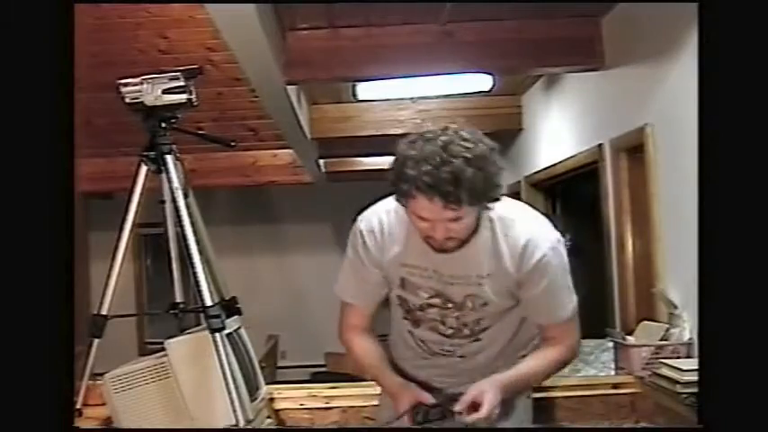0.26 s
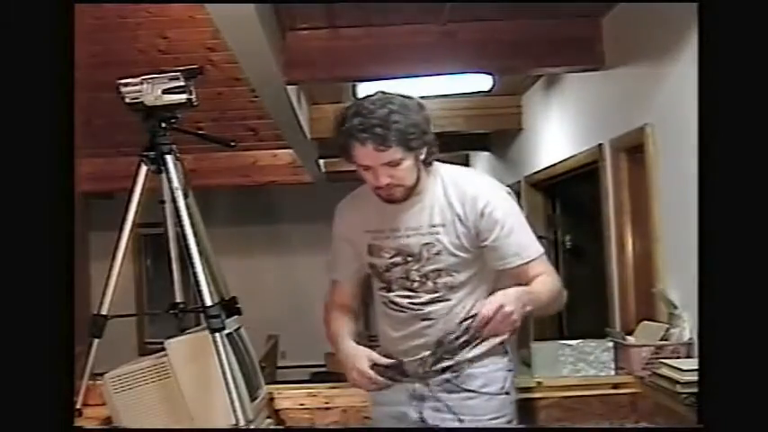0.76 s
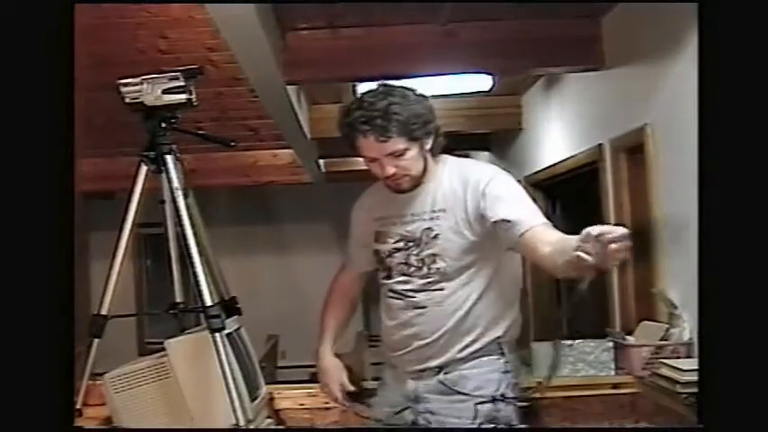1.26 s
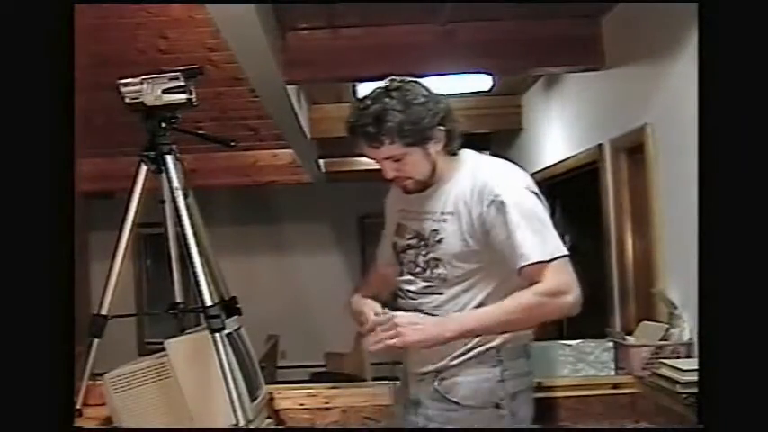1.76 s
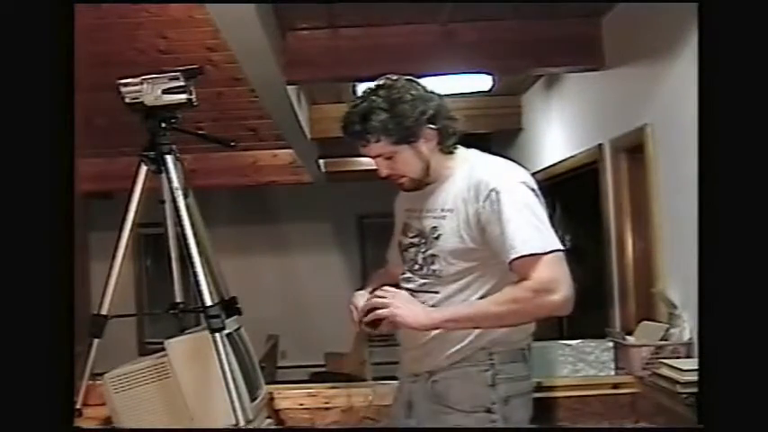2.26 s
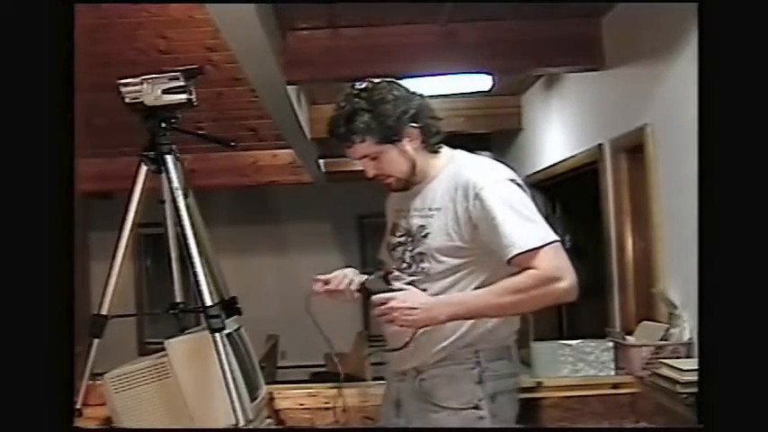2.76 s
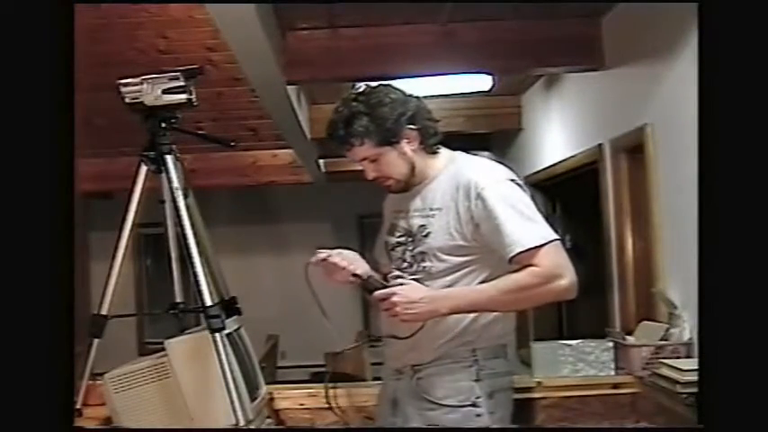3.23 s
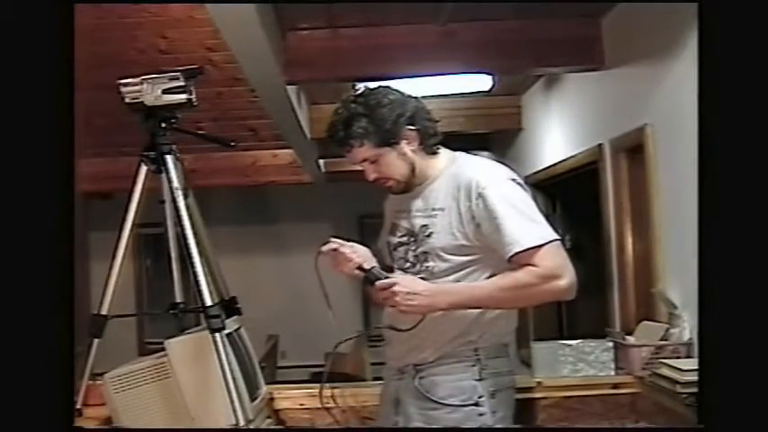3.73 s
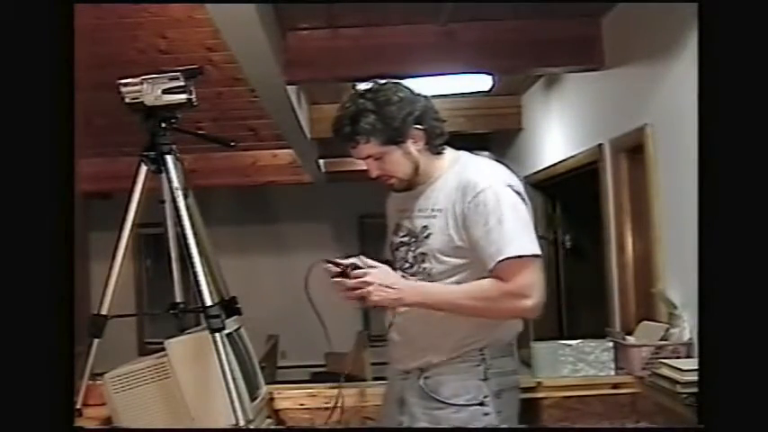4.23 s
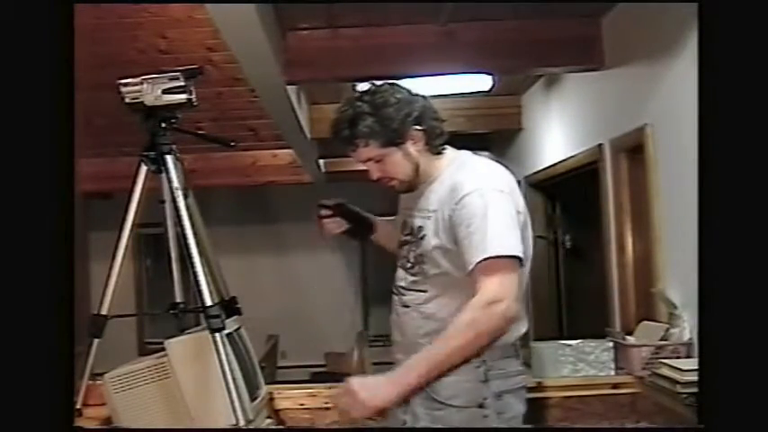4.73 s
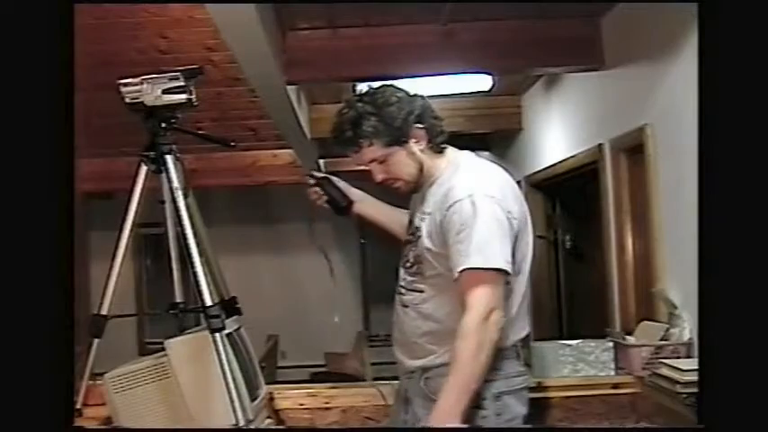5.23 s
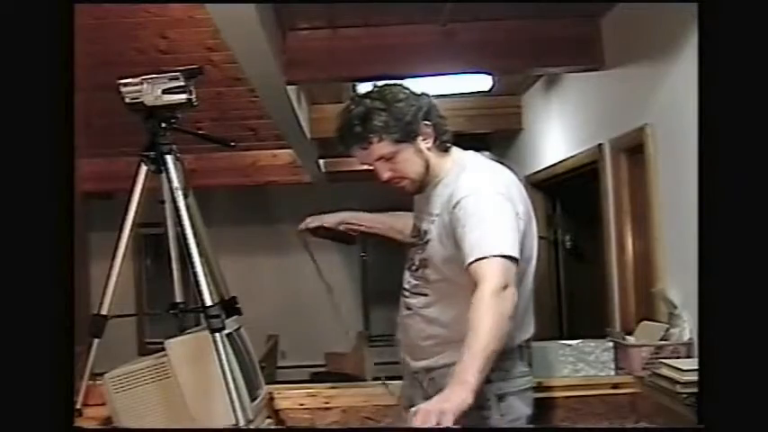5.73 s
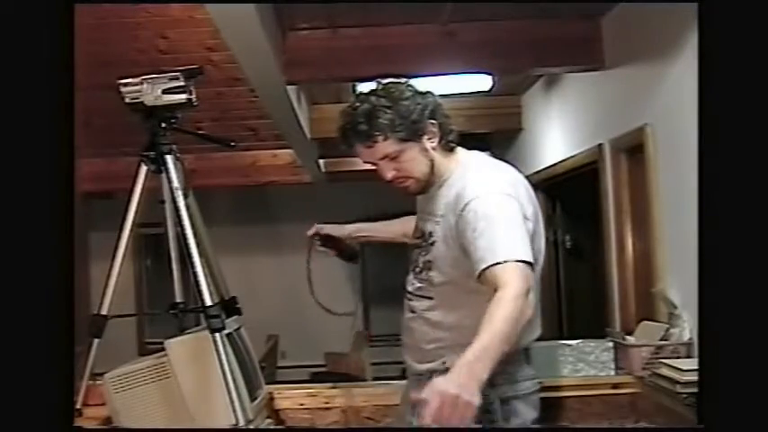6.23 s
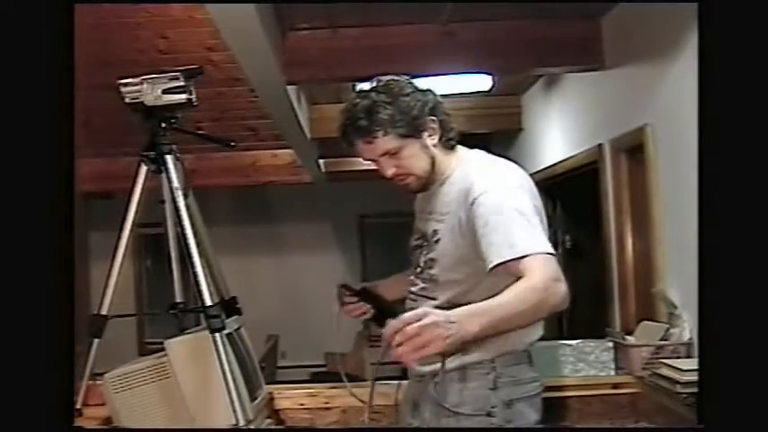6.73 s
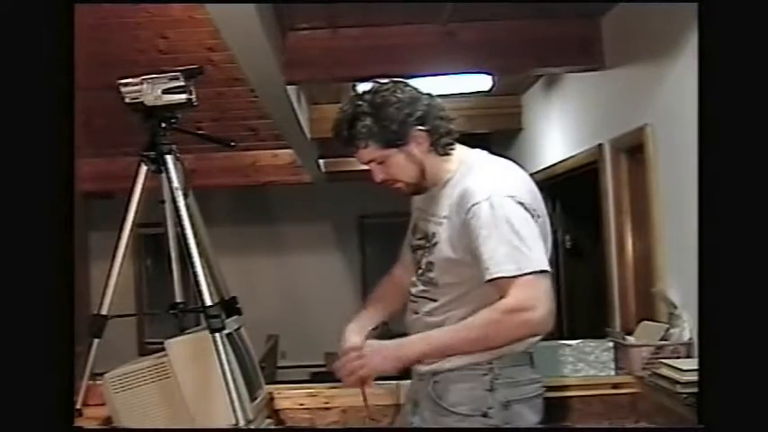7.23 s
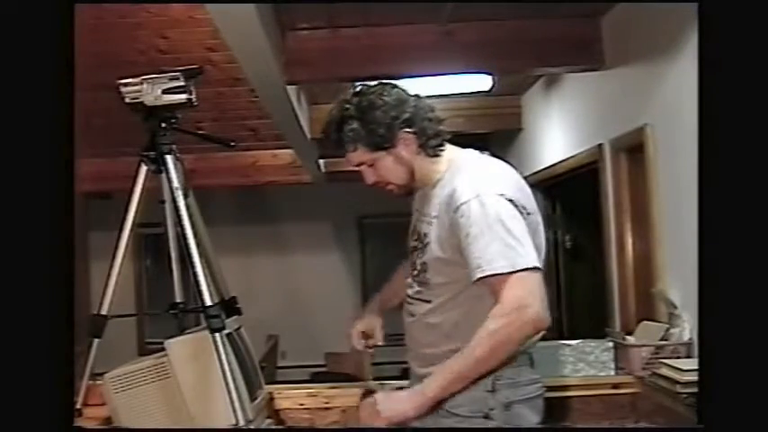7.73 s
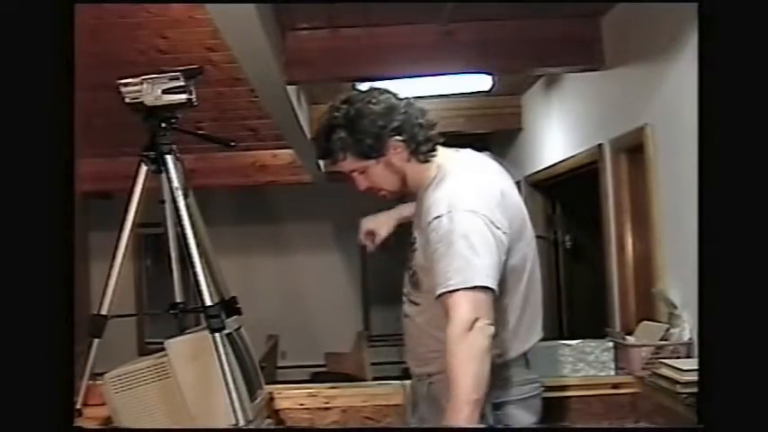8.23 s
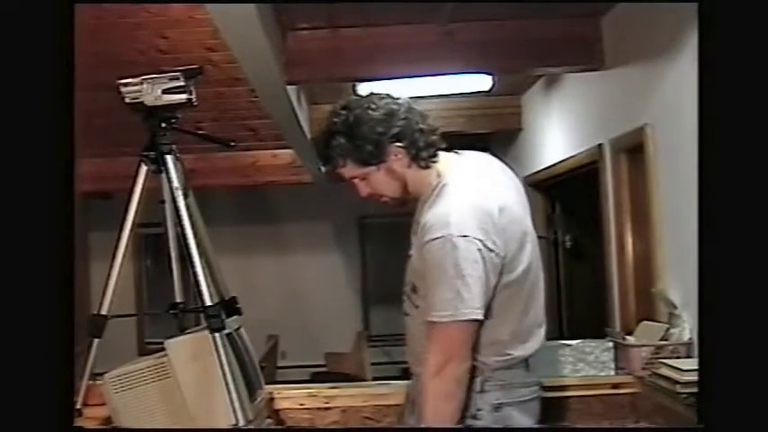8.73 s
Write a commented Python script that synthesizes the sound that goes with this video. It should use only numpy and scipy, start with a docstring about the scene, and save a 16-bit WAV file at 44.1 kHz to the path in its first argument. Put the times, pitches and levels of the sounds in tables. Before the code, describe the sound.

A power cord with a plastic plug block is picked up, turned over and put down on a wooden workbench. The cord slides and faintly squeaks through the hands, then sharp plastic snaps and hollow wooden knocks come at irregular intervals, with light ticks between. After a quieter stretch, more knocks follow and a loud clack ends it. A close camcorder microphone catches the small workshop's low rumble, hiss and faint motor whirr.

```python
"""A plastic plug block knocks on a wooden workbench as its power cord is gathered, turned and put down. Each
impact excites the modes of the boards and the case, and a small workshop reverberates briefly. Hard parts snap
together and set the metal prongs ringing; the bench thuds softly; the cord ticks, slides and squeaks. Beneath
lie room rumble, hiss and the motor whirr of a camcorder, whose limiter holds the blows down."""
import sys
import numpy as np
from scipy import signal
from scipy.fft import rfft, irfft
from scipy.io import wavfile
from scipy.ndimage import uniform_filter1d, minimum_filter1d

SR = 44100
rng = np.random.default_rng(int(sys.argv[2]) if len(sys.argv) > 2 else 0)


def pcm_store(signal):
    """Save signal as 16-bit PCM."""
    levels = np.round(np.clip(np.atleast_2d(signal), -1, 1) * 32767)
    wavfile.write(sys.argv[1], SR, levels.astype(np.int16).T)


N = 396018
TIME = np.arange(N) / SR
RING = np.arange(int(.8 * SR)) / SR  # seconds since a contact

# spectrum of room rumble, motor whirr and hiss: frequency_hz, relative_db
NOISE_SPECTRUM = [(18, -74.5), (30, -57.5), (74, -2.5), (358, -8.5), (444, -11), (550, -9.5), (590, -3.5),
                  (698, -7.5), (885, -9.5), (1270, -14.5), (1460, -12.5), (3130, -19), (4480, -15.5),
                  (5680, -21.5), (8940, -24), (11600, -43), (19700, -120)]
# tones of the motor: pitch_hz, relative_db
MOTOR_TONES = [(597.5, -78.5), (721.4, -80), (1437, -79), (1556, -93), (1680, -85.5), (1798, -90),
               (4317, -86.5), (7849, -91.5)]
# shifts of the background level: start_s, new_gain_db
LEVEL_SHIFTS = [(1.671, 6.5), (2.784, -1.9), (3.76, 0.57), (6.029, 5), (7.156, 0.1)]
# strokes of the cord through the hands: start_s, length_s, relative_db
CORD_STROKES = [(0.324, 0.59, -51), (0.909, .32, -54.5), (1.327, .04, -46.5), (2.045, .07, -44),
                (2.13, .18, -70), (2.411, 0.057, -50), (2.737, .05, -53), (4.282, 0.023, -62.5),
                (4.59, 0.24, -62), (4.78, 0.13, -59.5), (4.927, 0.028, -65), (5.09, 0.047, -59),
                (7.448, 0.26, -64)]
# spectrum of sliding friction: frequency_hz, relative_db
FRICTION_SPECTRUM = [(200, -17), (900, -8), (2000, -7.5), (2800, -10.5), (3700, 0), (4800, 0),
                     (5800, -13.5), (9000, -30.5)]
# squeaks of the jacket under the fingers: start_s, length_s, start_hz, end_hz, level_db
JACKET_SQUEAKS = [(.52, 0.2, 4980, 4750, -60), (0.953, 0.088, 4380, 4120, -54),
                  (1.16, 0.047, 4930, 4740, -61.5), (2.128, .22, 3860, 3760, -65)]
# soft thuds of the bench: start_s, pitch_hz, relative_db
BENCH_THUDS = [(0.224, 109, -45), (0.34, 99, -51.5), (.715, 260, -55), (.794, 276, -61), (1.102, 105, -53),
               (1.74, 415, -37.5), (1.875, 363, -50), (1.912, 111, -56), (2.051, 111.8, -61),
               (2.534, 104.9, -56.5), (2.914, 137, -52), (3.059, 266, -55.5), (4.16, 315, -56.5),
               (5.41, 356, -68), (6.496, 110, -41.5), (6.515, 516, -38), (6.68, 462.6, -47.5),
               (6.69, 107, -57), (7.55, 237.5, -47), (7.823, 258, -52)]
# the cord flops onto the same board after each knock: delay_s, re_knock_db
CORD_FLOPS = [(.061, -19), (.15, -30.5)]
# ticks of cord and plug in the hands: start_s, low_hz, low_db, high_hz, high_db
SHELL_TICKS = [(.275, 2046, -53.5, 3760, -45.5), (.481, 1884, -57, 3540, -55.5),
               (1.347, 1800, -84, 4530, -51.5), (1.873, 1110, -53, 4230, -55.5),
               (1.936, 3090, -55.5, 4210, -56.5), (1.954, 1820, -58, 4020, -54.5),
               (2.052, 1906, -55.5, 3760, -50.5), (2.419, 2900, -65.5, 6210, -60.5),
               (2.526, 1035, -58.5, 4630, -71), (2.991, 1800, -56.5, 4660, -56),
               (3.009, 1840, -65, 5090, -58), (3.227, 2120, -56.5, 5620, -62.5),
               (3.442, 1310, -55.5, 2630, -60), (3.446, 1900, -57.5, 5570, -69.5),
               (3.6, 2325, -73, 4670, -62), (4.303, 2410, -76, 4070, -67), (4.64, 3560, -81, 4820, -61),
               (4.663, 4300, -73, 5600, -63), (4.796, 2530, -55, 4850, -58),
               (4.838, 1114, -66.5, 4850, -65), (4.94, 5700, -70.5, 4220, -55),
               (7.576, 2360, -67, 4550, -74), (8.14, 934, -56, 4420, -74), (8.888, 1125, -67, 4340, -65.5)]
# modes of the metal prongs: pitch_hz, relative_db, t60_s
PRONG_MODES = [(1248, 0, 0.16), (1285, 1.5, .11), (1757, 2, 0.12), (1900, -2, 0.16), (2110, -0.5, 0.19),
               (2270, -7, 0.14), (3430, -11.5, 0.7), (3760, -13, 0.93), (4300, -6, 0.33)]
# plastic snaps: start_s, clack_hz, click_hz, t60_s, level_db, thud_db, body_db, edge_db, prong_db
# (the last four are relative to level_db)
PLASTIC_SNAPS = [(.187, 1946, 3890, 0.17, -32, -50, -21.5, -35, -2.5),
                 (1.623, 1533, 4470, 0.21, -32, -7.5, -13, -28, -24),
                 (1.671, 1880, 4280, .25, -24.5, -11.5, -20.5, -11, -15.5),
                 (1.812, 2000, 3970, 0.073, -44.5, -18.5, -5.5, -35, -10.5),
                 (3.759, 2310, 4385, 0.18, -41, -40.5, -13, -16.5, -22),
                 (6.029, 1691, 4570, 0.25, -28.5, -11, -1.5, -19, -33),
                 (6.499, 1990, 4150, 0.11, -41.5, -6, -1, -37, -19),
                 (7.888, 1740, 3990, 0.15, -49.5, 4.5, 2, -27, -27),
                 (8.967, 1350, 4356, 0.16, -21.5, 2.5, 3, -14.5, -12.5)]
# modes of the bench: pitch_hz, relative_db, base_t60_s (before added damping)
BENCH_MODES = [(236.3, -2.5, 0.14), (273.3, -16.5, 0.73), (310, -1, 0.22), (389, -4, 0.091),
               (457, -12.5, 0.33), (542, -7, 0.28), (599, -13.5, 0.47), (721, -3.5, 0.18), (783, -20, 0.52),
               (931, -38, 0.37), (1007, -20.5, 0.17), (1098, -35, 0.24), (1168, -15.5, 0.18),
               (1437, -48, 0.34)]
# knocks of the block on the bench: start_s, board_hz, level_db, frame_db, wood_db, hardness_hz
# (frame_db and wood_db weight the low thud and the woody midrange within one knock)
BLOCK_KNOCKS = [(1.737, 237.2, -21.5, -19.5, -16, 5800), (2.784, 309, -21, -13, -5, 6450),
                (3.91, 290.3, -37, -19.5, -10.5, 4230), (3.932, 278.3, -21, -18, -7, 4100),
                (6.442, 270.4, -23, -28, -5.5, 2120), (6.493, 414.4, -25, -15, -7, 5100),
                (7.156, 238.7, -23, -10.5, -7.5, 6500), (7.189, 245.2, -22, -15, -7, 6900),
                (7.244, 239.8, -32, -9.5, -12.5, 4330), (7.781, 276.7, -42.5, -13, -21.5, 3180)]
# difference between the two microphone ports: frequency_hz, side_re_mid_db
PORT_DIFFERENCE = [(60, -15.5), (100, -27), (180, -32), (310, -48), (540, -39), (940, -27.5), (1630, -26),
                   (2820, -12), (4900, -18.5), (8490, -15.5)]

FRAME_HZ, BOARD_HZ, WOOD_HZ = (114.5, 186), (214, 420), (475, 1165)  # band edges of the bench
CLACK_HZ, EDGE_HZ = (1210, 2270), (5200, 8350)  # band edges of the plastic


def undb(db):
    """Amplitude ratio of a level in decibels."""
    return 10 ** (np.asarray(db) / 20)


def unit(x):
    """Normalisation to rms 1."""
    return x / np.sqrt(np.mean(x ** 2))


def blow(x, db):
    """Normalisation of a transient: its first 25 ms take this rms level."""
    return undb(db) * x / np.sqrt(np.mean(x[:SR // 40] ** 2))


def decay(t60):
    """Exponential damping by 60 dB in t60 seconds."""
    return undb(-60 * RING / t60)


def rise(tau_s):
    """First-order build-up with time constant tau_s."""
    return 1 - np.exp(-RING / tau_s)


def band(x, edges, order=3):
    """Causal band-pass filtering."""
    return signal.sosfilt(signal.butter(order, edges, "band", fs=SR, output="sos"), x)


def around(hz, spread):
    """Band edges at equal ratios below and above a centre."""
    return hz / (1 + spread), hz * (1 + spread)


def dull(x, hz):
    """Finite contact time: little is excited above this frequency."""
    return signal.sosfilt(signal.butter(12, hz, fs=SR, output="sos"), x)


def response(points, size):
    """Frequency response: gain per FFT bin, interpolated in decibels over log frequency."""
    hz, db = np.transpose(points)
    bins = np.maximum(np.fft.rfftfreq(size, 1 / SR), 1)
    return undb(np.interp(np.log(bins), np.log(hz), db))


def colour(x, points):
    """Spectral shaping of a steady sound, to rms 1."""
    return unit(irfft(rfft(x) * response(points, N), N))


def walk(rate_hz):
    """Smooth random fluctuation of rms 1."""
    step = int(SR / rate_hz)
    held = np.repeat(rng.standard_normal(N // step + 2), step)
    return unit(uniform_filter1d(held, step)[:N])


def add(out, start_s, x):
    """Superposition of a sound at its starting time."""
    i = int(start_s * SR)
    out[i:i + len(x)] += x[:N - i]


def ring(modes, damping=1):
    """Free vibration: damped modes whose phases differ with each contact."""
    return sum(undb(db) * np.sin(2 * np.pi * (hz * RING + rng.random())) * decay(t60 / damping)
               for hz, db, t60 in modes)


def reflections(t60, direct_db, tail_db, tail_t60, sparse):
    """Room impulse response: the direct crack, a few lone echoes, then a diffuse fading wash."""
    lone_echoes = np.exp(sparse * np.exp(-RING / 0.046) * rng.standard_normal(len(RING)))
    fade = decay(t60) + undb(tail_db) * decay(tail_t60)
    wash = blow(rng.standard_normal(len(RING)) * lone_echoes * fade, 0)
    wash[0] += undb(direct_db) * np.sqrt(SR / 40)  # energy relative to the first 25 ms
    return wash


def shell(contact, hz, spread, tone_db, t60, neighbour_db):
    """Shell resonance: one clear mode, short-lived neighbours that vary by contact, and a broad wash."""
    neighbours = [(hz * (1 + spread) ** offset, neighbour_db, 0.67 * t60)
                  for offset in rng.uniform(-1.1, 0.92, size=4)]
    modes = ring([(hz, 0, t60)] + neighbours) * rise(0.0022)
    wash = band(contact, around(hz, spread), order=2)
    return blow(blow(wash, 0) + blow(modes, tone_db), 1.2)


def background(start_gain_db=8.5, shift_s=0.11):
    """Frequency modulation: uneven speed bends the motor's tones; they and the noise shift in level."""
    noise = colour(rng.standard_normal(N), NOISE_SPECTRUM) * undb(-69 + walk(7.6))
    motor = np.zeros(N)
    for hz, db in MOTOR_TONES:
        amplitude = np.sqrt(2) * undb(db + 1.1 * walk(18))
        pitch_hz = hz * (1 + 0.0033 * walk(40))
        motor += amplitude * np.sin(2 * np.pi * np.cumsum(pitch_hz) / SR)
    gain_db = np.full(N, start_gain_db)
    for start_s, new_db in LEVEL_SHIFTS:
        gain_db += (new_db - gain_db) * np.clip((TIME - start_s) / shift_s, 0, 1)
    return (noise + motor) * undb(gain_db)


def cord_slides(attack_s=.022, sag_db=9, release_s=.03):
    """Sliding friction: the jacket catches and slips in tiny grains, weakening as the hand slows."""
    envelope = np.zeros(N)
    for start_s, length_s, db in CORD_STROKES:
        attack = np.minimum(RING / attack_s, 1)
        sag = undb(db - sag_db * np.minimum(RING / length_s, 1))
        release = np.exp(-np.maximum(RING - length_s, 0) / release_s)
        add(envelope, start_s, attack * sag * release)
    grains = rng.standard_normal(N) * undb(4.3 * np.minimum(rng.exponential(size=N), 6))
    return colour(grains, FRICTION_SPECTRUM) * envelope * undb(-3.5 + 1.3 * walk(35))


def jacket_squeaks():
    """Stick-slip oscillation: an unsteady tone whose pitch sinks as the hand slows."""
    out, waver_hz = np.zeros(N), 80 * walk(300)
    for start_s, length_s, start_hz, end_hz, db in JACKET_SQUEAKS:
        progress = np.clip((TIME - start_s) / length_s, 0, 1)
        hz = start_hz + (end_hz - start_hz) * progress + waver_hz
        out += undb(db) * np.sin(np.pi * progress) * np.sin(2 * np.pi * np.cumsum(hz) / SR)
    return out * undb(3.6 * walk(59.7))


def bench_thuds():
    """Soft impact: the push is slow, so only one low, well damped mode of the bench responds."""
    out = np.zeros(N)
    flops = [(start_s + delay_s, hz, db + re_knock_db)
             for start_s, hz, db, *_ in BLOCK_KNOCKS for delay_s, re_knock_db in CORD_FLOPS]
    for start_s, hz, db in BENCH_THUDS + flops:
        swell = rise(0.0091) ** 2
        mode = np.sin(2 * np.pi * hz * RING) * decay(.11)
        contact = reflections(0.28, direct_db=-1, tail_db=-23.5, tail_t60=0.92, sparse=.3)
        room = band(contact, around(hz, spread=.35), order=2)
        bump = blow(swell * mode, 0) + blow(swell * room, -6)
        add(out, start_s, blow(bump, db - 0.5))
    return out


def finger_touches(per_s=2.2):
    """Random excitation: rows like SHELL_TICKS for faint touches at scattered times and places."""
    draws = rng.random((int(per_s * N / SR), 3))
    return [(when * N / SR, 1900 * 2 ** (low - .5), -81, 4400 * 2 ** ((high - .5) / 2), -77)
            for when, low, high in draws]


def shell_ticks():
    """Light impact: the point of contact selects two resonances of the shell."""
    out = np.zeros(N)
    for start_s, low_hz, low_db, high_hz, high_db in SHELL_TICKS + finger_touches():
        contact = reflections(0.16, direct_db=-14, tail_db=-15.5, tail_t60=0.56, sparse=0.82)
        contact *= rise(0.0013)
        low = shell(contact, low_hz, spread=0.25, tone_db=0, t60=0.13, neighbour_db=-10)
        high = shell(contact, high_hz, spread=0.11, tone_db=-1, t60=0.14, neighbour_db=-6)
        add(out, start_s, blow(low, low_db) + blow(dull(high, 1.2 * high_hz), high_db))
    return out


def plastic_snaps():
    """Hard impact: a brief force excites the body, two shell resonances and the ringing prongs."""
    out = np.zeros(N)
    for start_s, clack_hz, click_hz, t60, db, thud_db, body_db, edge_db, prong_db in PLASTIC_SNAPS:
        contact = reflections(t60, direct_db=-12, tail_db=-19, tail_t60=0.25, sparse=0.53)
        contact *= rise(0.0011)
        thud = blow(band(contact, (290, 520)), thud_db)
        body = blow(band(contact, (800, 1400)), body_db)
        clack = shell(contact, clack_hz, spread=0.32, tone_db=-4.5, t60=.18, neighbour_db=-4.5)
        clack = blow(clack, -2.5 + 0.28 * body_db)  # more body, more clack
        click = shell(contact, click_hz, spread=0.25, tone_db=-8, t60=0.21, neighbour_db=-5.5)
        click = blow(dull(click, 5700), 0)
        edge = blow(band(contact, EDGE_HZ, order=4), edge_db)
        prongs = blow(ring(PRONG_MODES), prong_db)
        add(out, start_s, undb(db) * (thud + body + clack + click + edge + prongs))
    return out


def block_knocks():
    """Modal response to impact: the case cracks at once; the boards swing up in a few cycles and ring."""
    out = np.zeros(N)
    for start_s, board_hz, db, frame_db, wood_db, hardness_hz in BLOCK_KNOCKS:
        contact = reflections(0.16, direct_db=-10.5, tail_db=-21, tail_t60=.5, sparse=0.66)
        frame = blow(band(contact, FRAME_HZ), frame_db - 0.5)
        bench = contact + blow(ring(BENCH_MODES, damping=1.3), -15)
        struck_mode = np.sin(2 * np.pi * board_hz * RING) * rise(.006) * decay(0.1424)
        boards = blow(band(bench, BOARD_HZ), 0) + blow(struck_mode, 0.92)
        wood = blow(band(bench, WOOD_HZ), wood_db + 1.5)
        # narrow-band noise stands for close-lying low modes that beat as they fade
        beating = unit(band(rng.standard_normal(len(RING)), around(1.061 * board_hz, spread=0.31)))
        after_ring = beating * undb(frame_db) * rise(0.01) * decay(0.56)
        case = reflections(0.1472, direct_db=-7.5, tail_db=-22, tail_t60=0.49, sparse=0.89)
        hardness_oct = np.log2(hardness_hz / 6540)  # a harder contact cracks the case more
        clack = blow(band(case, CLACK_HZ, order=2), -17 + 6 * hardness_oct)
        click = blow(band(case, around(3880, spread=0.25), order=2), -14.5 + 19.5 * hardness_oct)
        crack = dull(wood + clack + click, hardness_hz)
        add(out, start_s, undb(db) * (frame + blow(boards, -2.1) + crack + after_ring))
    return out


def scene():
    """Superposition at two close microphone ports, which differ by a small phase, mainly in the treble."""
    impacts = block_knocks() + plastic_snaps() + shell_ticks() + bench_thuds()
    mid = impacts + cord_slides() + jacket_squeaks() + background()
    side = irfft(1j * rfft(mid, 2 * N) * response(PORT_DIFFERENCE, 2 * N))[:N]  # in quadrature
    return np.array([mid + side, mid - side])


def record(dry):
    """Peak limiting holds the blows down; a low-pass cuts the top, and an electronic whine lies above."""
    ceiling_db, window_samples, cutoff_hz = -10.5, 129, 9150
    whine_hz, whine_db = 11993, -85.5
    needed_gain = np.minimum(1, undb(ceiling_db) / (np.abs(dry).max(axis=0) + 1e-9))
    gain = uniform_filter1d(minimum_filter1d(needed_gain, window_samples), window_samples)
    low_pass = signal.ellip(10, .2, 70, cutoff_hz, fs=SR, output="sos")
    whine = np.sqrt(2) * undb(whine_db) * np.sin(2 * np.pi * whine_hz * TIME)
    return signal.sosfilt(low_pass, dry * gain) + whine


dry = scene()
out = record(dry)
pcm_store(out)
```